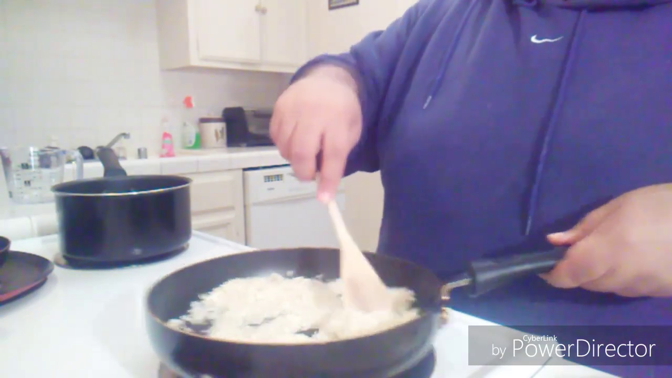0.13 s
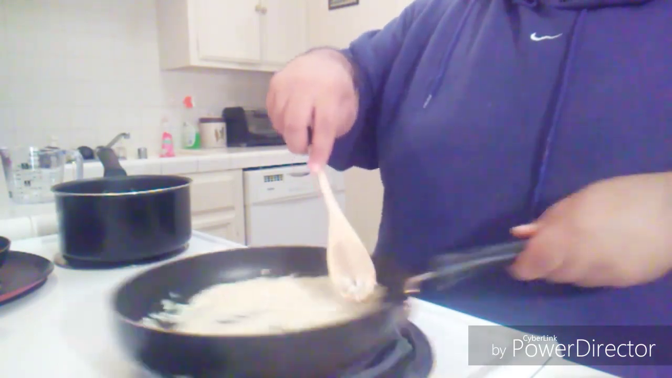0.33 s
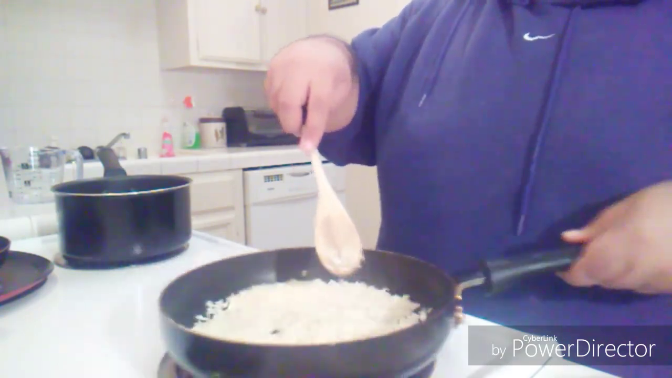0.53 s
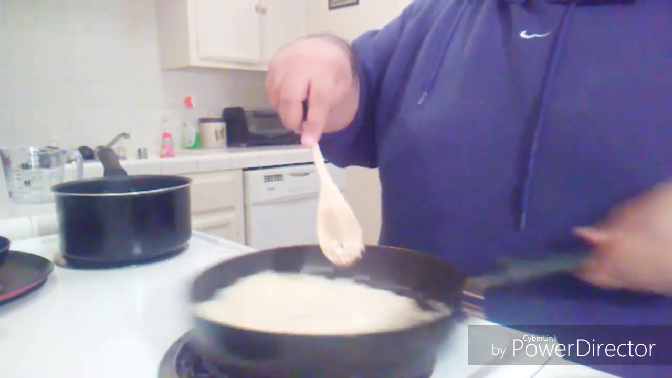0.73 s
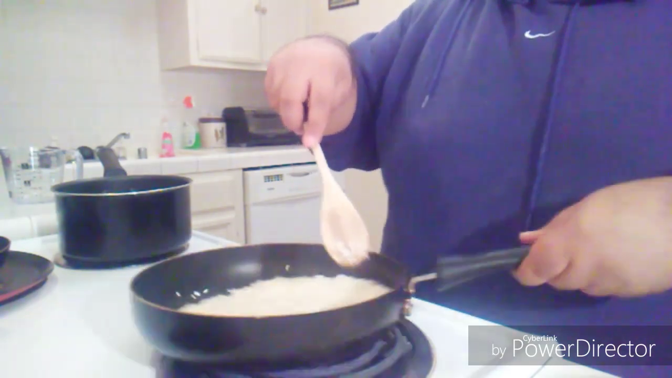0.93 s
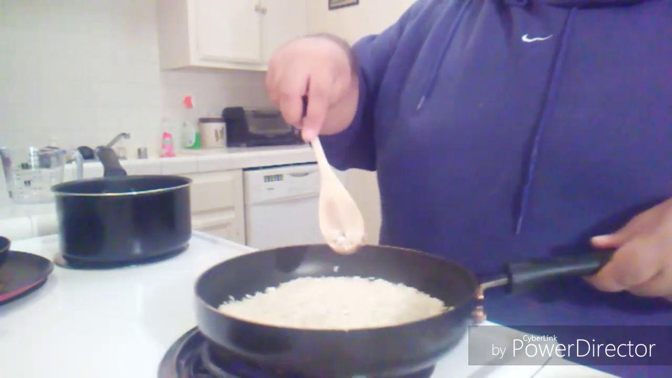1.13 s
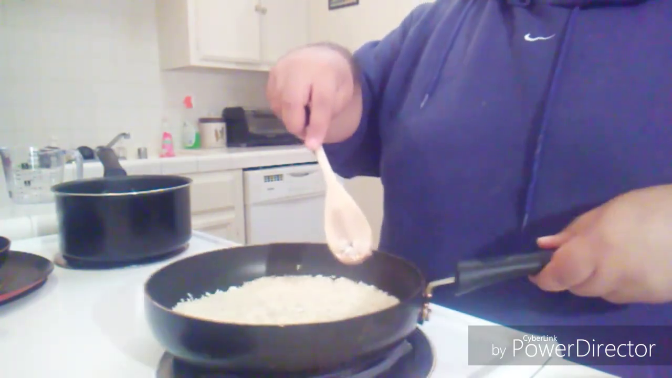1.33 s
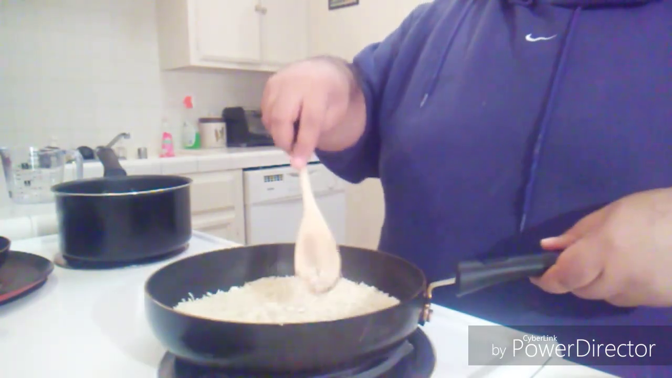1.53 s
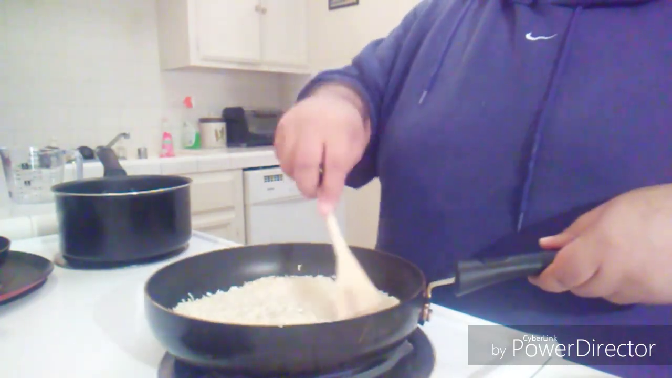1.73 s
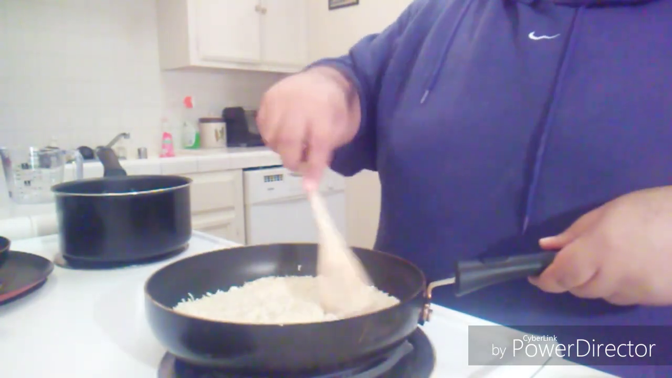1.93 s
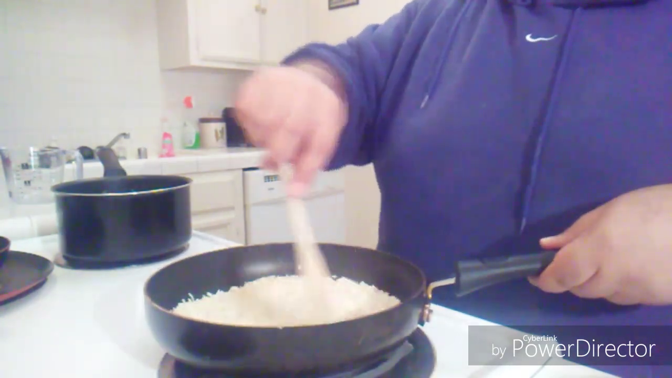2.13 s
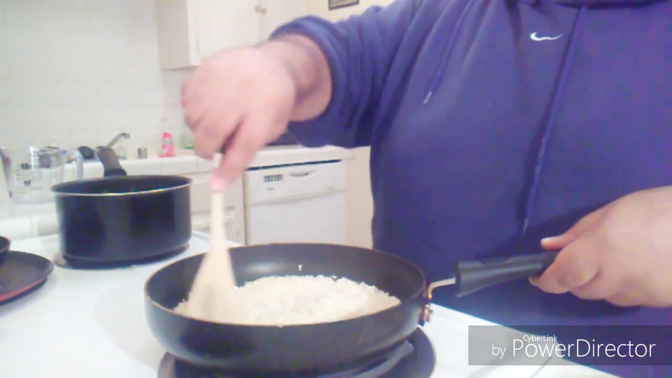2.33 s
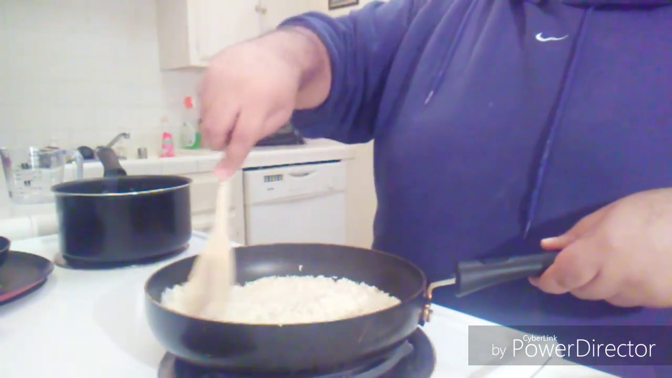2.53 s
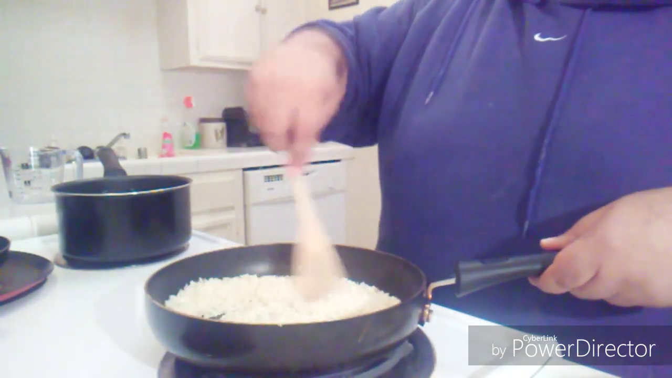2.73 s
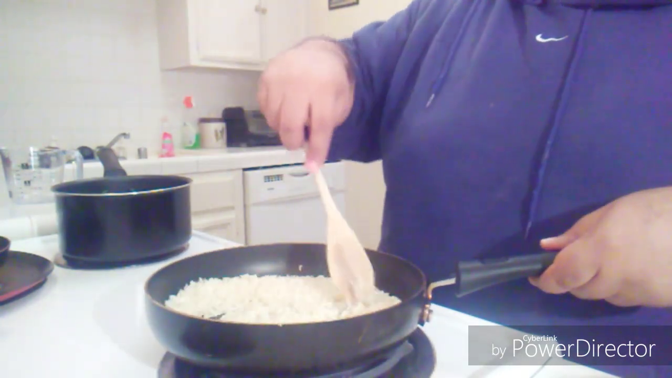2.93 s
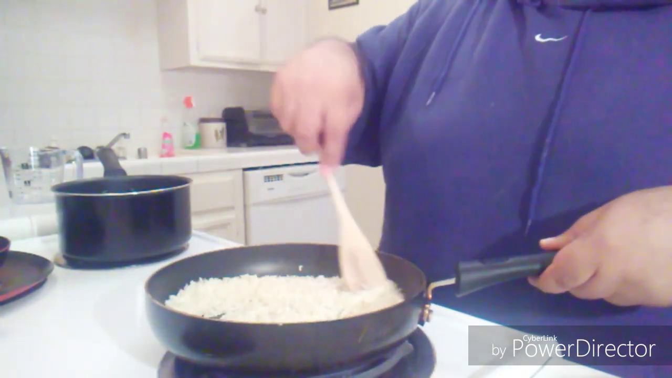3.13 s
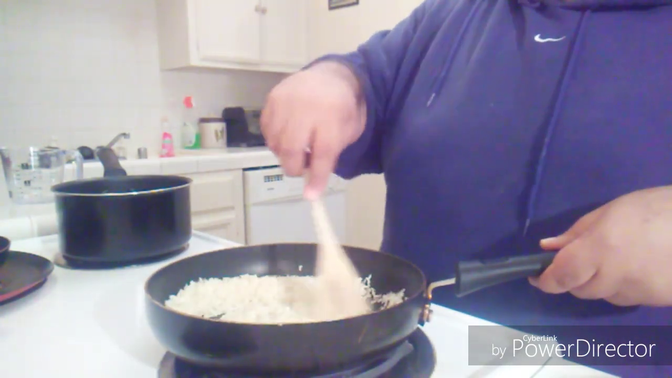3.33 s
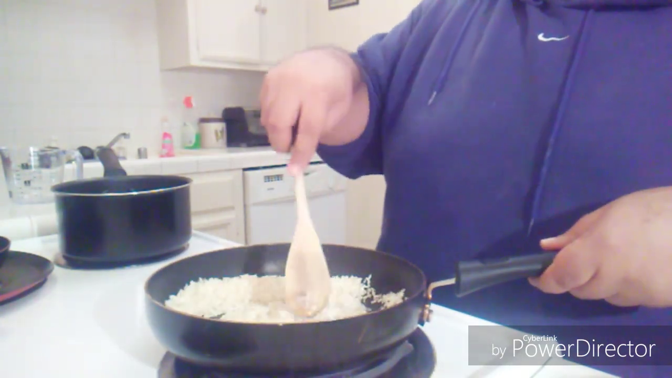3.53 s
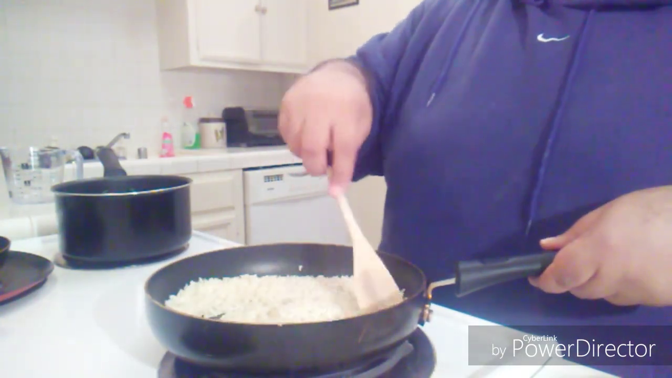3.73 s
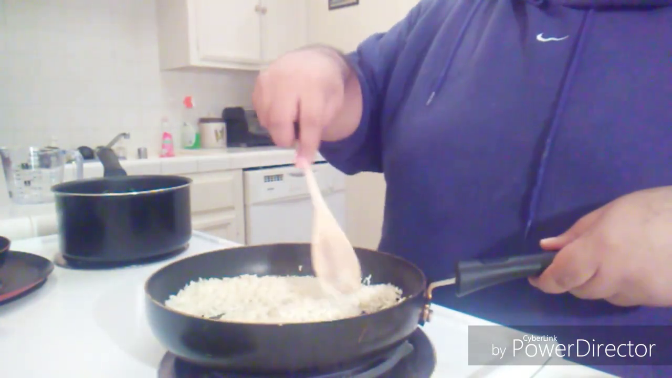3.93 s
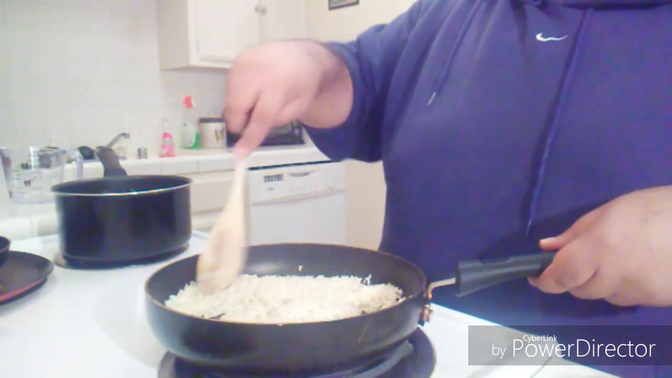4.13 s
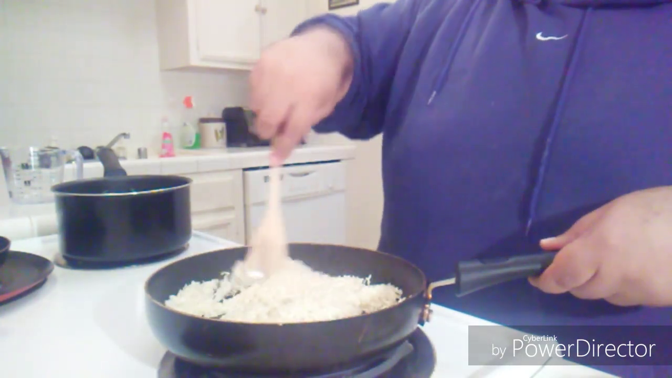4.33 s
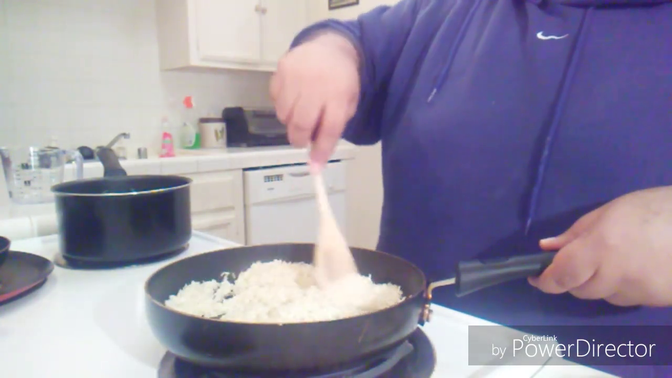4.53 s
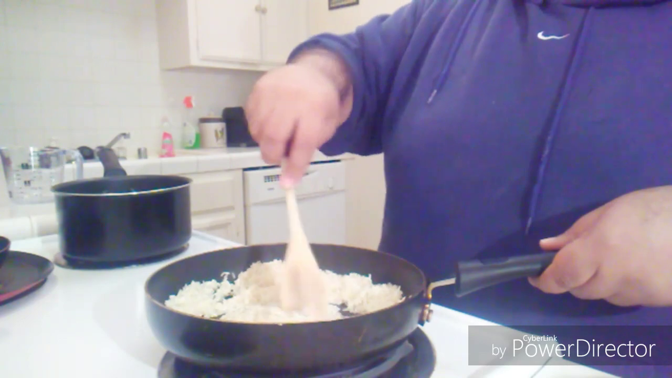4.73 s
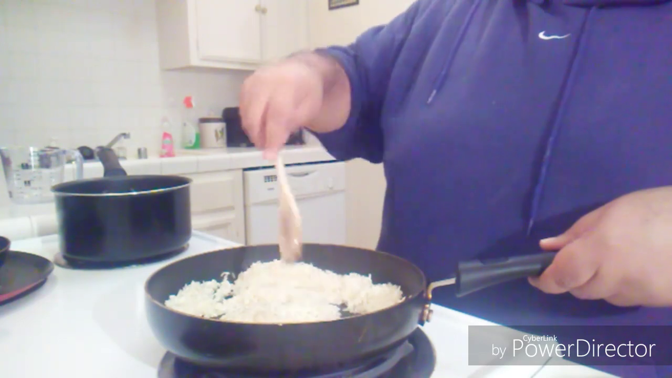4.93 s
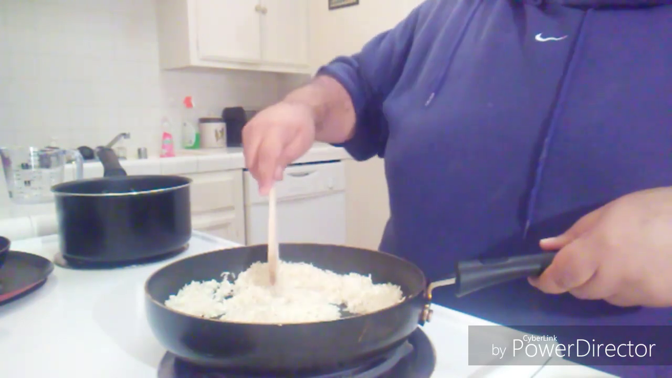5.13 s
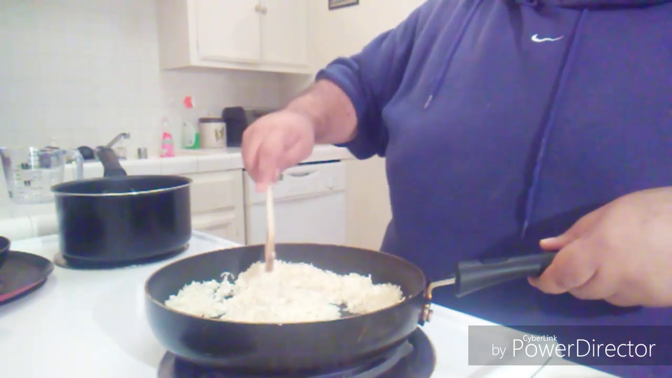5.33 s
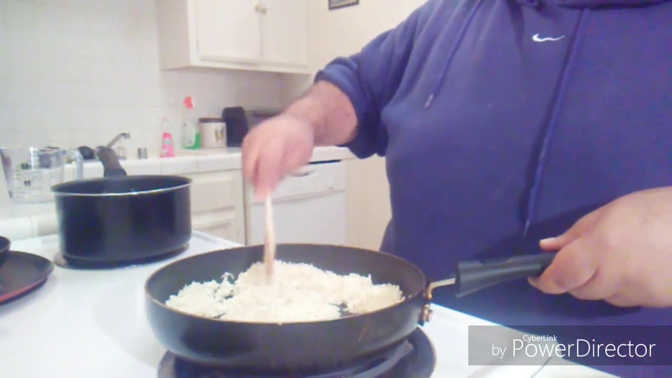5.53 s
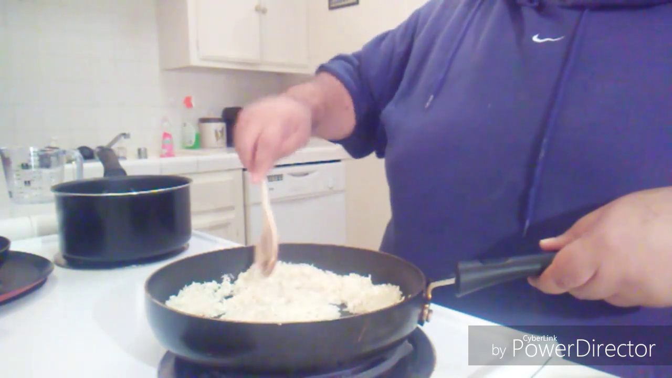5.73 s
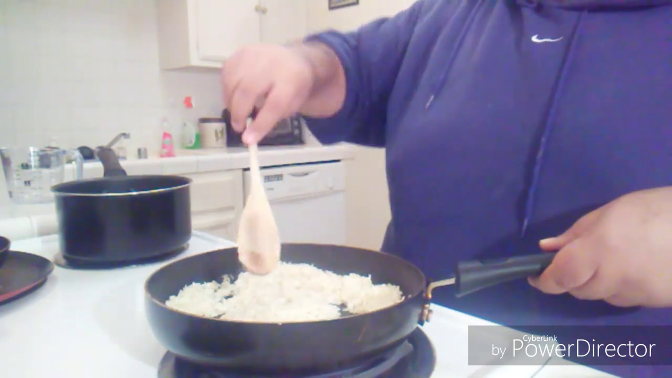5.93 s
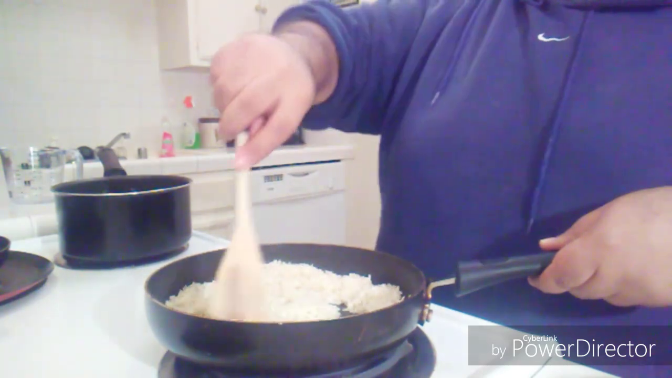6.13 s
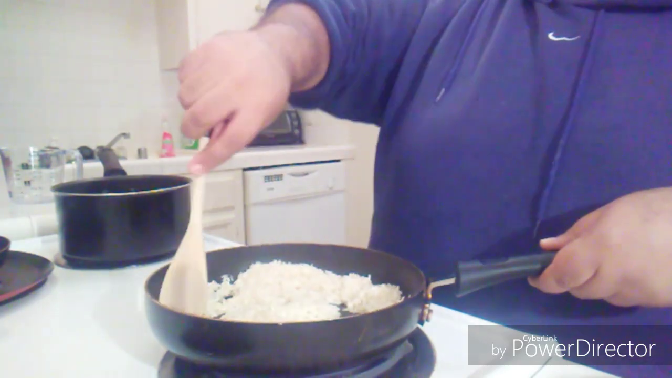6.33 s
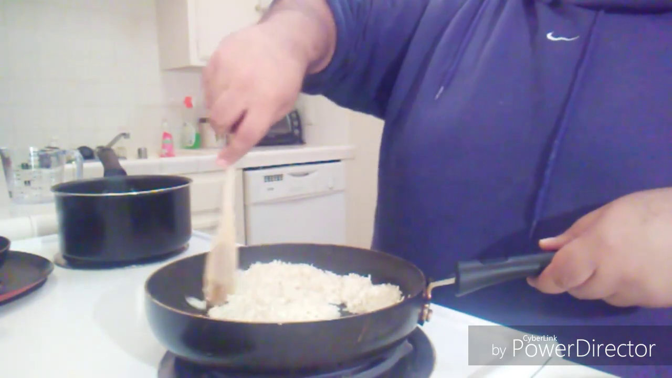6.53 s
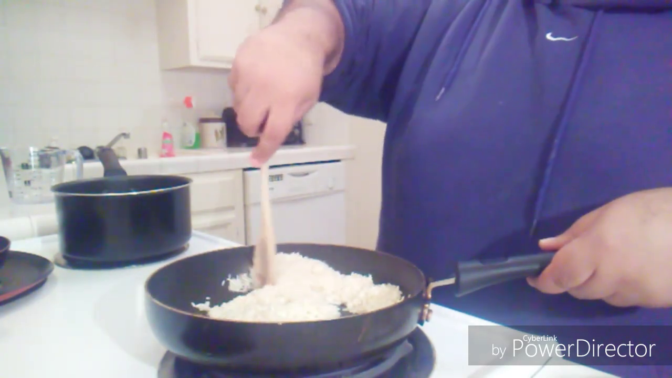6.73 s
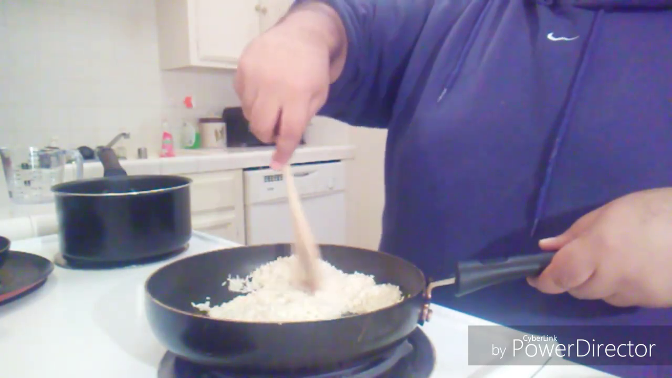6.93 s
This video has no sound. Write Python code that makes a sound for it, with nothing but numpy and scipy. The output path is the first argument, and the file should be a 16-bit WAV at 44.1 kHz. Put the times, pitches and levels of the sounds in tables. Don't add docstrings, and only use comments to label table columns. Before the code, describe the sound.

Dry rice surges loudly in a shaken frying pan on a stove coil, then a wooden spoon scrapes, squeaks and knocks through the grains.

```python
import sys
import numpy as np
from scipy import signal
from scipy.fft import rfft, irfft, next_fast_len
from scipy.io import wavfile
from scipy.ndimage import uniform_filter1d, minimum_filter1d, map_coordinates

SR = 44100
rng = np.random.default_rng(int(sys.argv[2]) if len(sys.argv) > 2 else 0)


def rack_gain(trim_db):
    fader = np.asarray(trim_db, float)
    return 10 ** (fader / 20)


def digitize_waveform(pressure):
    field = np.atleast_2d(pressure).T
    bounded = np.clip(field, -1, 1)
    quanta = np.round(bounded * 32767).astype(np.int16)
    wavfile.write(sys.argv[1], SR, quanta)


N = 308259

# t/s, peak level/dB, thud/dB, sprayed grains/dB
KNOCKS = [
    (2.1565, -14, 2.5, -28),
    (5.3809, 1, -1, -23.5),
    (5.5481, 2, -1.5, -24),
    (5.704, 10, -13.5, -11.5),
    (6.354, -42.5, 29.5, -49),
]
PUSH_RISE_DB_S, PUSH_FALL_DB_S = 870, 150


def unit(x):
    return x / np.sqrt(np.mean(x ** 2) + 1e-20)


def along(points, hz):
    f, v = np.transpose(points)
    return np.interp(np.log(hz + 1), np.log(f + 1), v)


def curves(rows):
    s, *cols = np.transpose(rows)
    return np.array([np.interp(np.arange(N) / SR, s, c) for c in cols])


def wobble(rate_hz):
    knots = rng.standard_normal(int(N * rate_hz / SR) + 4)
    return map_coordinates(knots, [np.arange(N) * rate_hz / SR])


def filtered(x, response):
    m = next_fast_len(N + SR // 2)
    return irfft(rfft(x, m) * response(np.fft.rfftfreq(m, 1 / SR)), m)[:N]


def modes(table):
    def response(f):
        total = 0
        for k, (centre_hz, width_hz, db) in enumerate(table):
            damping = 1j * f * width_hz
            total = total + (-1) ** k * rack_gain(db) * damping / (centre_hz * centre_hz - f * f + damping)
        return total
    return response


def steep(table):
    low_hz, top_hz = 1.2 * table[0][0], 1.2 * table[-1][0]

    def response(f):
        highpass = (1j * f / low_hz / (1 + 1j * f / low_hz)) ** 2
        return modes(table)(f) * highpass / (1 + 1j * f / top_hz)
    return response


def colour(table):
    return lambda f: rack_gain(along(table, f))


def driven(force, blows, exciter, response):
    return filtered(force * exciter + blows, response) / np.std(filtered(exciter, response))


def swell(s, length_s, start_db, end_db, rise_db_s, fall_db_s):
    t = np.arange(N * 1000 // SR + 2) / 1000
    course = np.interp(t, [s, s + length_s + 1e-3], [start_db, end_db])
    return course - rise_db_s * np.maximum(s - t, 0) - fall_db_s * np.maximum(t - s - length_s, 0)


def per_sample(power):
    return np.interp(np.arange(N) * 1000 / SR, np.arange(len(power)), np.sqrt(power))


def air():
    # f/Hz, density/dB
    tone_points = [(71, -31), (120, -3), (200, -23), (479, -28.5), (552, -19.5), (624, -31), (899, -25.5),
                   (3440, -35), (6340, -25), (8600, -35), (15500, -42.5)]
    # f/Hz, density/dB
    rumble_points = [(15, -23), (30, -16), (60, -6), (90, -7.5)]
    noise = filtered(rng.standard_normal(N), colour(rumble_points + tone_points[1:]))
    return rack_gain(-58 + .8 * wobble(1.4)) * unit(noise)


def engine():
    # t/s, firing f/Hz, level/dB, second order/dB
    engine_course = [(2.3, 83.8, -68, -82), (2.77, 82.1, -64, -69), (3.05, 84, -61, -70),
                     (3.2, 83.8, -71, -80), (3.3, 80.3, -47.5, -70), (3.52, 81.84, -45.5, -67),
                     (3.72, 83.2, -61, -69), (3.85, 83.3, -40, -70), (4.05, 80.8, -41.5, -63),
                     (4.15, 82.2, -46, -73), (4.24, 73.3, -64.5, -77), (4.35, 63.14, -59.5, -70.5),
                     (4.69, 59.8, -49, -65), (4.95, 53.15, -54, -65), (5.13, 51.6, -54.5, -57.5),
                     (5.82, 51, -49.5, -60), (6.0, 50.55, -68.5, -80.5), (6.99, 51.4, -69.5, -76.5)]
    hz, first_db, second_db = curves(engine_course)
    phase = 2 * np.pi * np.cumsum(hz * (1 + 0.011 * wobble(21))) / SR
    first = rack_gain(first_db + .8 * wobble(8)) * np.sin(phase)
    second = rack_gain(second_db + 1.7 * wobble(7.8)) * np.sin(2 * phase)
    return np.sqrt(2) * (first + second)


def kitchen(x):
    # f/Hz, t60/s
    decay_points = [(100, 0.089), (300, 0.27), (1800, 0.37), (5000, 0.31), (12000, 0.45)]
    wet, hop = np.zeros(N + 2 * SR), SR // 4
    for start in range(0, N, hop):
        hz, t, z = signal.stft(rng.standard_normal(3 * hop), SR, nperseg=256)
        fade = rack_gain(-60 * t / along(decay_points, hz)[:, None])
        next_room = rack_gain(-29.0 - 60 * t / 0.95) * (1 - t / t[-1])
        tail = signal.istft(z * (fade + next_room), SR, nperseg=256)[1]
        piece = signal.fftconvolve(x[start:start + hop], tail / np.linalg.norm(tail))
        wet[start + 250:][:len(piece)] += piece
    return wet[:N]


def rocking():
    # t/s, level/dB
    pushes = [(.01, -38.5), (.1, -37.5), (.66, -18.5), (1.15, -22), (1.65, -48), (1.845, -31),
              (2.165, -30.5), (2.36, -47.5), (2.86, -55), (3.27, -37), (3.851, -44.5), (4.75, -50.5),
              (5.415, -26.5), (5.575, -25.5), (5.73, -27.5), (6.39, -53), (6.785, -51)]
    return sum(rack_gain(swell(s, 0, db, db, PUSH_RISE_DB_S, PUSH_FALL_DB_S)) ** 2 for s, db in pushes)


def stove():
    # f/Hz, width/Hz, level/dB
    stove_modes = [(73, 34, -15.5), (108.4, 5.6, 0), (123.8, 11, -0.5), (143.3, 22, -0.5), (193, 40, -12)]
    shaken_db = swell(.29, 1.21, -26, -28.5, PUSH_RISE_DB_S, PUSH_FALL_DB_S)
    power, blows = rocking() + rack_gain(shaken_db) ** 2, np.zeros(N)
    for s, db, _, _ in KNOCKS:
        blows[round(s * SR)] = rack_gain(db - 2.5)
    return driven(per_sample(power), blows, rng.standard_normal(N), steep(stove_modes))


def squeaks():
    # t/s, length/s, start f/Hz, end f/Hz, level/dB
    squeak_events = [(1.96, .1, 6700, 6650, -38), (1.98, .07, 5600, 5550, -43),
                     (1.97, .07, 3800, 3750, -50), (2.33, .16, 5650, 5950, -47),
                     (6.46, .14, 4050, 3950, -40), (6.6, .09, 3800, 3700, -46),
                     (6.44, .19, 5750, 5850, -35), (6.47, .16, 6250, 6400, -36),
                     (6.64, .05, 4750, 4700, -41), (6.64, .06, 6200, 6000, -39),
                     (4.322, .035, 6250, 6150, -39)]
    t, sound = np.arange(N) / SR, np.zeros(N)
    for s, length_s, start_hz, end_hz, db in squeak_events:
        u = np.clip((t - s) / length_s, 0, 1)
        phase = 2 * np.pi * np.cumsum(start_hz + (end_hz - start_hz) * u) / SR
        tone = wobble(330) * np.sin(phase) + wobble(330) * np.cos(phase)
        sound += rack_gain(db) * np.sqrt(np.abs(np.sin(np.pi * u))) * tone
    return sound


def contacts(share, spread_db, clump_db, clump_rate_hz):
    struck = rng.random(N) < share
    size = rack_gain(spread_db * np.minimum(rng.exponential(1, N), 4.0) + clump_db * wobble(clump_rate_hz))
    return unit(struck * size * rng.standard_normal(N))


def patchy(x, depth_db):
    z = signal.stft(x, nperseg=512)[2]
    field = rng.standard_normal(z.shape)
    for _ in range(2):
        field = uniform_filter1d(uniform_filter1d(field, size=4, axis=0), size=18, axis=1)
    return unit(signal.istft(z * rack_gain(depth_db * unit(field)), nperseg=512)[1][:N])


def exciters():
    chatter = rack_gain(2.5 * wobble(70))
    grains = patchy(contacts(share=.32, spread_db=.4, clump_db=1.5, clump_rate_hz=60), depth_db=2.0)
    scrape = unit(chatter * contacts(share=.1, spread_db=1.15, clump_db=1.5, clump_rate_hz=70))
    wood = contacts(share=.25, spread_db=-.7, clump_db=.55, clump_rate_hz=41)
    rasp = patchy(chatter * wood, depth_db=2.0)
    grind = contacts(share=.3, spread_db=2.0, clump_db=.66, clump_rate_hz=53)
    return grains, scrape, rasp, grind


def motion():
    # t/s, length/s, rattle start/dB, rattle end/dB, bottom pressure/dB
    strokes = [(.22, .06, -41.5, -31, 4), (1.839, .07, -32.5, -32.5, -8), (1.915, 0.08, -33.5, -30.5, -5),
               (2.279, 0.055, -47, -44, -9), (2.556, .1, -37.5, -35, -15), (3.402, .1, -35.5, -32.5, -10),
               (3.51, 0.089, -32.5, -33, -4.5), (3.82, 0.0714, -43.5, -40, -9.5),
               (3.907, .09, -30.5, -36, -8.5), (4.35, .08, -46, -29, -25), (4.43, .16, -34.5, -29, -10),
               (4.805, 0.089, -29, -36.5, 2), (6.461, 0.1, -28, -35, -10.5), (6.579, 0.2, -35, -39, -4.5),
               (6.766, 0.23, -42, -53, -8.5)]
    # t/s, length/s, rattle start/dB, rattle end/dB, bottom pressure/dB
    scrapes = [(0.0, 0.073, -34, -38, -4), (0.101, .12, -38.5, -31, -14), (2.355, 0.17, -38, -42, -4.5),
               (2.672, 0.18, -29, -37.5, -3.5), (2.858, 0.079, -28, -34, -3.5),
               (3.22, .17, -30.5, -38, -12), (4.6, 0.18, -28, -33.5, -1.5),
               (5.225, 0.023, -34, -35.5, -10.5)]
    # t/s, length/s, rattle start/dB, rattle end/dB
    slides = [(.285, 0.026, -28.5, -14.5), (0.319, 0.051, -14.5, -25.5), (0.419, 0.088, -10.5, -21.5),
              (0.526, 0.089, -14, -19.5), (0.629, .2, -9.5, -26.5), (0.86, .02, -13, -14.5),
              (0.888, 0.044, -8, -13.5), (0.952, .04, -22, -12), (0.993, .085, -13.5, -12),
              (1.077, .13, -13, -18.5), (1.234, 0.11, -5.5, -32), (1.359, .12, -16.5, -22),
              (1.481, 0.21, -34.5, -55.5), (1.74, 0.22, -61.5, -64.5)]
    power = np.outer([0, 0, 0, rack_gain(-6.5) ** 2], rocking())
    for rows, offset_db, share in [(strokes, -7.5, .45), (scrapes, 0, .6)]:
        for *shape, press_db in rows:
            bodies_db = np.array([0, press_db, offset_db + share * press_db, -25.5 + .3 * press_db])
            power += rack_gain(swell(*shape, 900, 424) + bodies_db[:, None]) ** 2
    for shape in slides:
        surge_db = swell(*shape, 1840, 740)
        course_db = np.clip(surge_db, min(shape[2:]), None) + 14.5
        evening_db = np.outer([0, .26, .35, .27], course_db)
        bodies_db = np.array([0, -4, -2, -5])[:, None] - evening_db
        power += rack_gain(surge_db + bodies_db) ** 2
    for s, _, thud_db, spray_db in KNOCKS:
        bodies_db = np.array([0, -3, 2.5, -3]) + .26 * thud_db * np.array([0, 1, 1, 1])
        power += rack_gain(swell(s + .011, 0, spray_db, spray_db, 9000, 169) + bodies_db[:, None]) ** 2
    return power


def hits():
    # t/s, jumping rice peak/dB, pan ring/dB, coil/dB, rattle t60/s
    jolts = [(0.286, -18.5, 3.5, 4.5, 0.056), (.4005, 2.5, -6, -7.5, .05), (0.4358, 1.5, -31, -25, .09),
             (0.5259, -0.5, -14, -15, .06), (0.6209, 2.5, -16, -14, .13), (.7272, 4, -12, -24, 0.099),
             (0.8573, 4, -18, -20, 0.054), (0.8866, 8, -19.5, -24.5, 0.12), (.985, -5, 1.5, -11, 0.13),
             (1.0494, 1.5, -9.5, -7.5, .065), (1.231, 4.5, -18.5, -9.5, .09),
             (1.3559, -7.5, -1.5, 0.5, 0.1), (1.4575, -4, -5, -10, .12), (1.6235, -23.5, -1, -1, 0.1)]
    # t/s, peak level/dB, pan ring/dB, spoon/dB
    taps = [(.0879, -14, -7, -6), (1.8303, -17.5, -5, -9), (2.0074, -18, -23, -15), (2.3506, -42, 14, 2),
            (2.6748, -19.5, -15, -8.5), (2.817, -31, 8.5, 14), (2.848, -19.5, 10.5, 6),
            (3.136, -26, -27.5, -19), (3.2031, -15.5, -19, -18.5), (3.243, -13.5, -7, -6.5),
            (3.2594, -13, -5, -8), (3.5444, -28, 10.5, -13), (3.6044, -32.5, 13, -10.5),
            (3.818, -28.5, -15.5, -22), (3.9038, -12.5, -28.5, -14), (4.211, -23, -36, -37),
            (4.3306, -24, -40, -25), (4.6104, -23.5, 9.5, -19), (4.7171, -19, 8, 3), (4.7971, -20, -1, 1.5),
            (4.8083, -17.5, 9.5, 5.5), (4.8274, -17.5, 7, -0.5), (5.214, -17.5, -5, -12.5),
            (5.2325, -21, -14, -1.5), (6.4576, -29.5, -4, -23), (6.7023, -24, -6, -36)]
    blows = [(s, db, ring_db, -7.5, coil_db, t60_s) for s, db, ring_db, coil_db, t60_s in jolts]
    for s, db, thud_db, _ in KNOCKS:
        blows.append((s, db, thud_db, -2.4 + .8 * thud_db, -6.5 + .75 * thud_db, .067))
    for s, db, ring_db, spoon_db in taps:
        t60_s = .09 * rack_gain(-.6 * max(ring_db, 0))
        blows.append((s, db, ring_db, spoon_db, -37, t60_s))
    return blows


def forces():
    moving = rack_gain(-2.0) * np.array([per_sample(row) for row in motion()])
    power = np.pad(moving ** 2, ((0, 0), (0, SR)))
    t, blows = np.arange(SR // 3) / SR, np.zeros((4, N))
    for s, db, ring_db, spoon_db, burner_db, t60_s in hits():
        i = round(s * SR)
        peak = rack_gain(db + np.array([-12, ring_db - 8.5, spoon_db - 8.5, burner_db - 8.0]))
        onset_s = 0.00028 * max(rack_gain(-.8 * db - 12.5), 1)
        shape = rack_gain(-60 * t / max(t60_s, .01)) * (1 - np.exp(-t / onset_s))
        power[:, i:][:, :len(t)] += np.outer(peak, shape) ** 2
        blows[:, i] = peak * rack_gain([0.5, 21.5, 19.5, 19.5])
    return np.sqrt(power[:, :N]), blows


def pan():
    # f/Hz, density/dB
    ploughed_rice = [(1650, -39.5), (2800, -21.5), (3160, -27.5), (3810, -11.5), (4460, -11.5), (5980, -3),
                     (6430, -5), (6910, -11), (8560, -25), (15500, -38.5)]
    # f/Hz, density/dB
    tossed_rice = [(1470, -40), (2500, -17), (3340, -14), (4300, -4), (5250, -8), (5970, -1.5), (6750, -9),
                   (8550, -28.5), (14800, -44.5), (15500, -42)]
    # f/Hz, width/Hz, level/dB
    pressed_bottom = [(658.4, 73, -14.5), (877, 33, 1), (936, 28, -5), (1000, 110, -12.5)]
    # f/Hz, width/Hz, level/dB
    free_bottom = [(685.4, 42, -1), (819, 83, -1), (864.5, 60, 1.5), (926, 100, -8.5)]
    # f/Hz, width/Hz, level/dB
    spoon_modes = [(1072, 150, -4), (1272, 170, -1), (1430, 177, 1), (1614, 178, 1.5), (1886, 262, -2.5),
                   (2365, 324, -4.5), (2518, 295, -4), (3570, 1800, -13.5)]
    # f/Hz, width/Hz, level/dB
    coil_modes = [(240, 13, 0.5), (309, 44, -7.5), (356, 46, -5.5), (434.3, 59, -3), (499.4, 40, -3),
                  (560, 130, -7.5)]
    # from t/s, to t/s
    free_spans = [
        (.28, 1.7),
        (2.14, 2.3),
        (2.81, 2.87),
        (5.3, 6.05),
        (6.34, 6.44),
    ]
    force, blows = forces()
    clock = np.arange(N) / SR
    free = sum((clock > a) & (clock < b) for a, b in free_spans)
    wood_and_coil = [steep(spoon_modes), steep(coil_modes)]
    pressed = [colour(ploughed_rice), steep(pressed_bottom)] + wood_and_coil
    loose = [colour(tossed_rice), steep(free_bottom)] + wood_and_coil
    sound = np.zeros(N)
    for gate, bodies in [(1 - free, pressed), (free, loose)]:
        sound += sum(driven(*part) for part in zip(gate * force, gate * blows, exciters(), bodies))
    return sound


def scene():
    near = pan() + squeaks()
    return (near + rack_gain(-8.5) * kitchen(near) + stove() + engine() + air())[None]


def band_limit(x):
    return signal.sosfilt(signal.butter(12, 15670, fs=SR, output="sos"), x)


def record(dry):
    needed = np.minimum(1, .97 / (np.abs(dry) + 1e-9))
    gain = uniform_filter1d(minimum_filter1d(needed, size=25, axis=1), size=25, axis=1)
    mix = filtered((dry * gain)[0], lambda f: f < 15700)[None]
    return band_limit(mix)


dry = scene()
out = record(dry)
digitize_waveform(out)
```